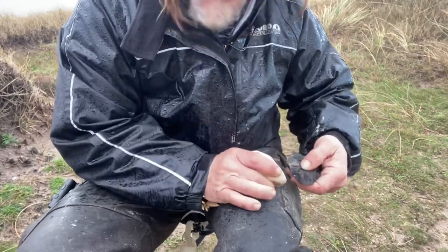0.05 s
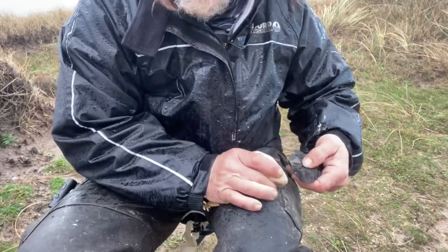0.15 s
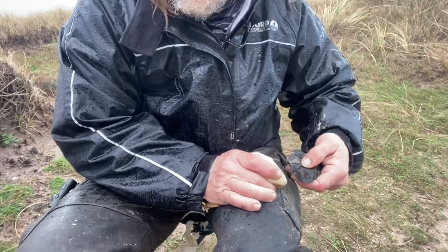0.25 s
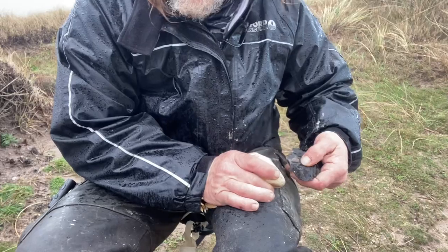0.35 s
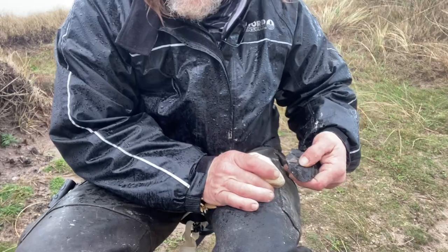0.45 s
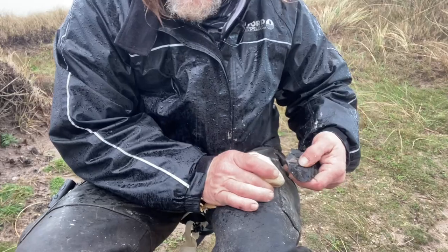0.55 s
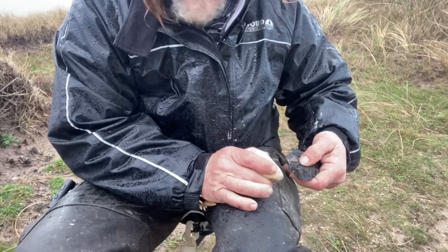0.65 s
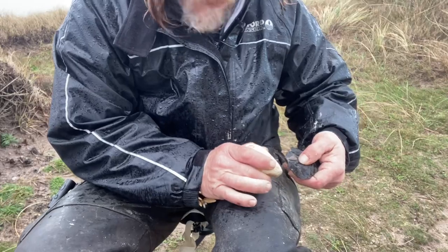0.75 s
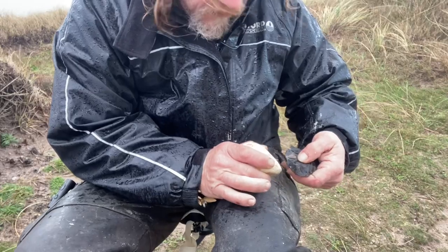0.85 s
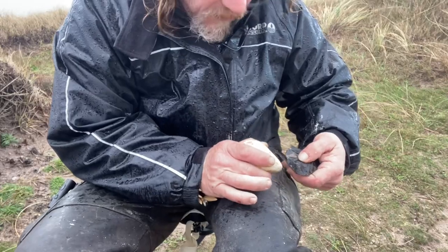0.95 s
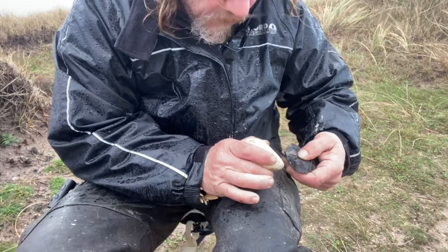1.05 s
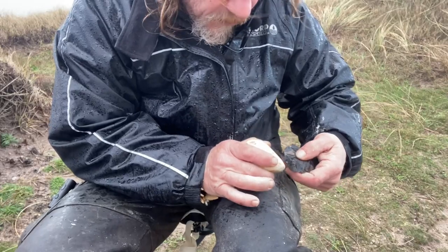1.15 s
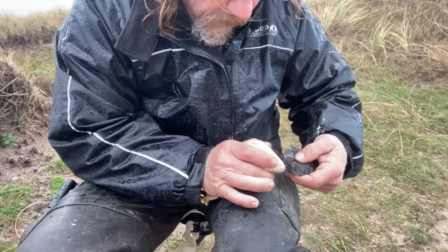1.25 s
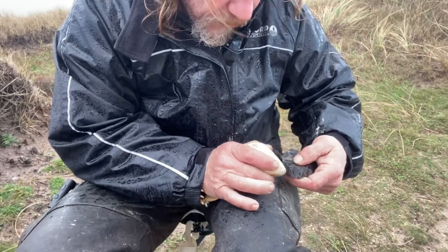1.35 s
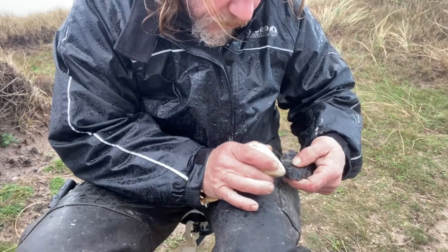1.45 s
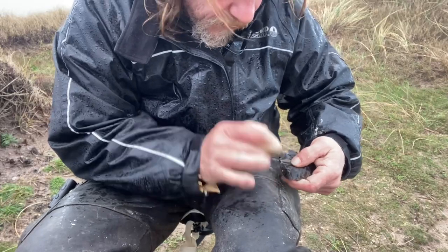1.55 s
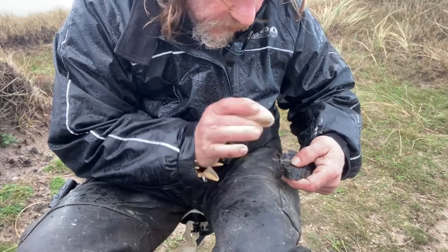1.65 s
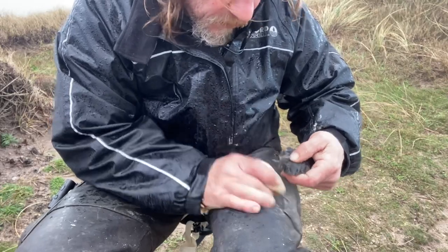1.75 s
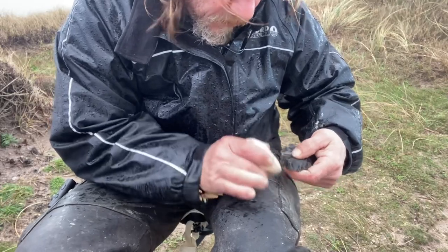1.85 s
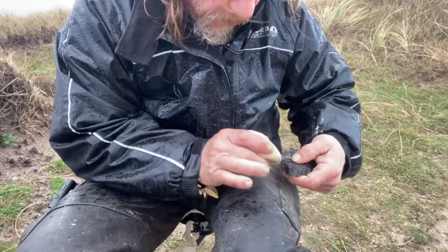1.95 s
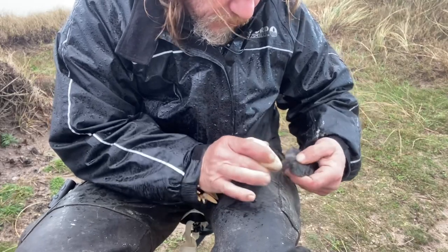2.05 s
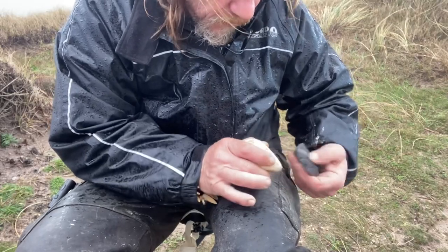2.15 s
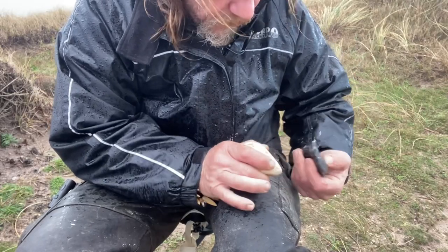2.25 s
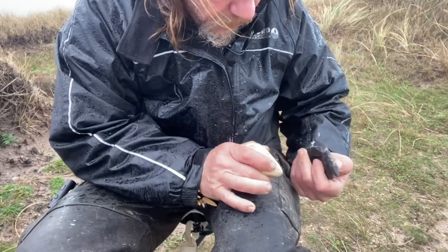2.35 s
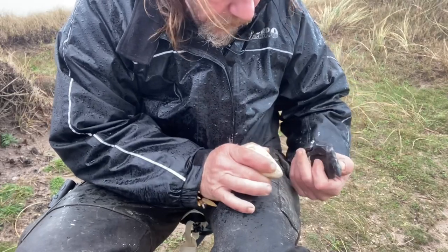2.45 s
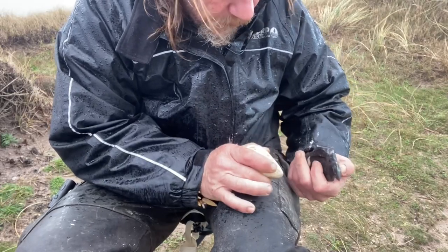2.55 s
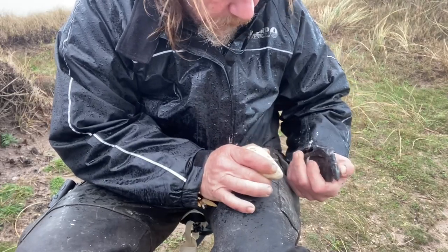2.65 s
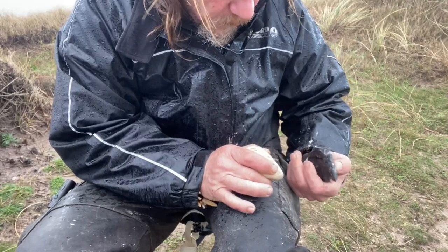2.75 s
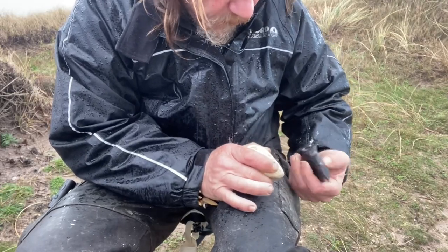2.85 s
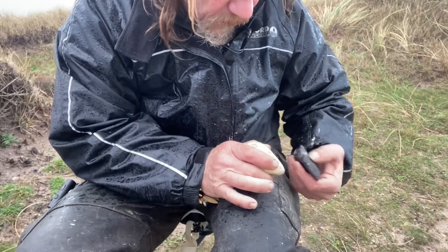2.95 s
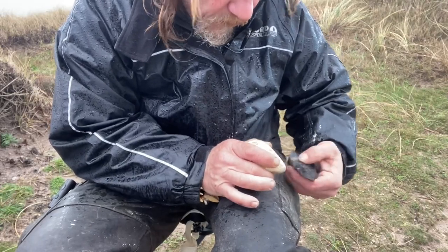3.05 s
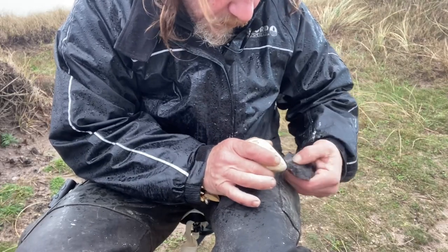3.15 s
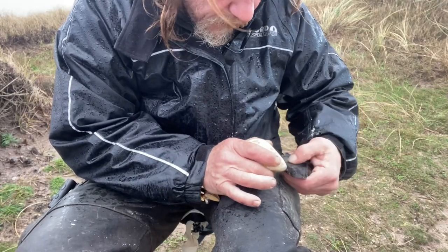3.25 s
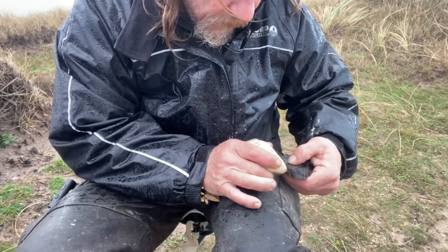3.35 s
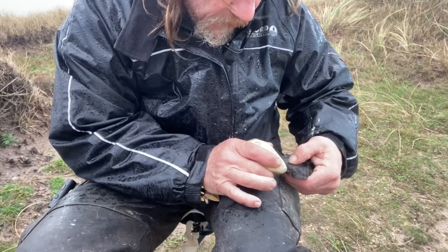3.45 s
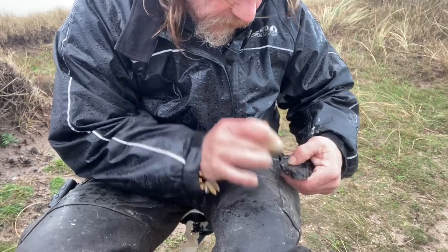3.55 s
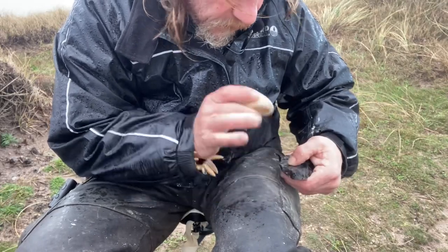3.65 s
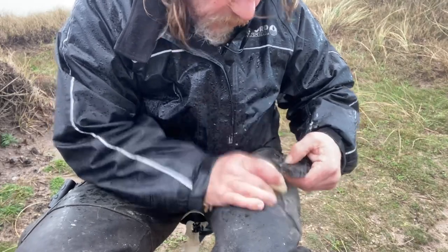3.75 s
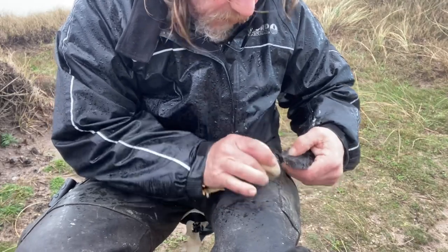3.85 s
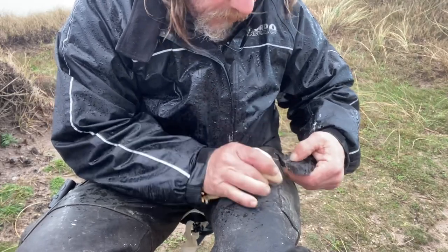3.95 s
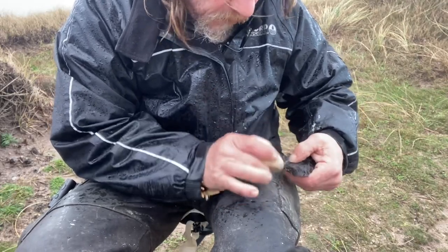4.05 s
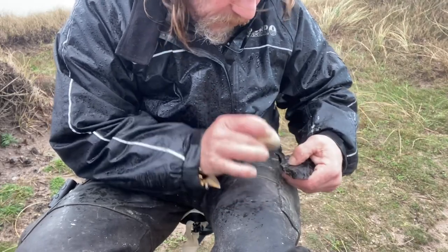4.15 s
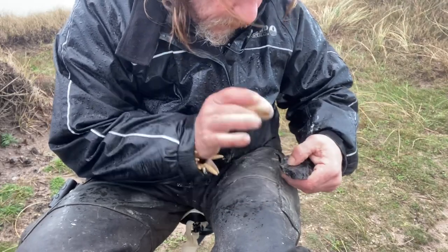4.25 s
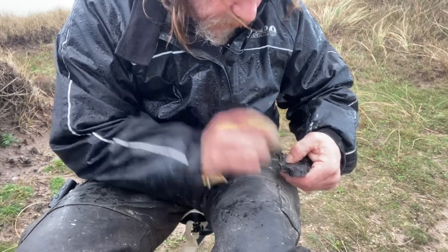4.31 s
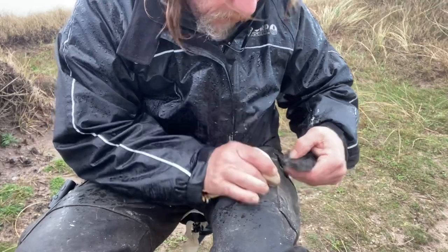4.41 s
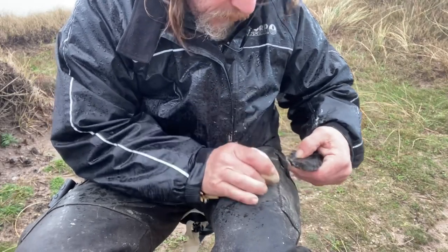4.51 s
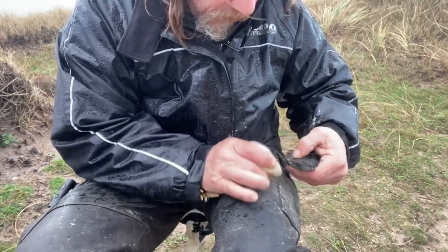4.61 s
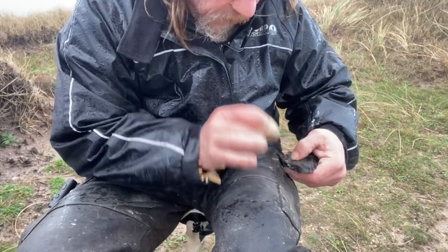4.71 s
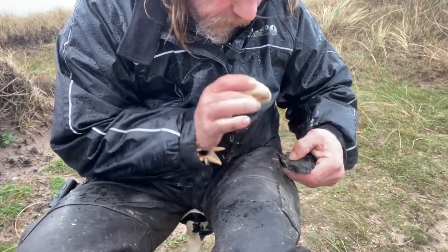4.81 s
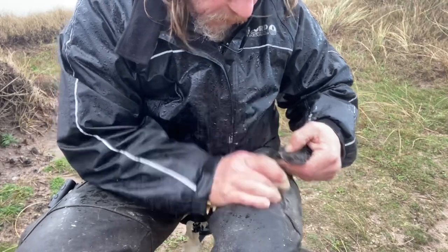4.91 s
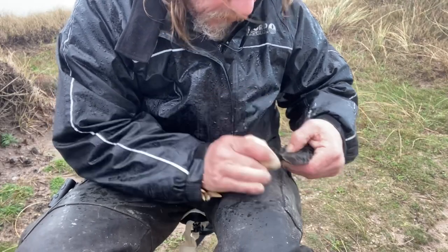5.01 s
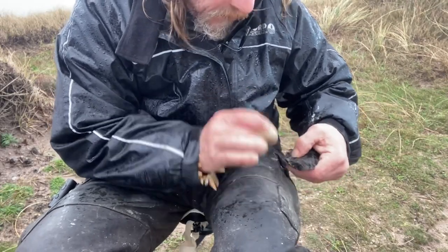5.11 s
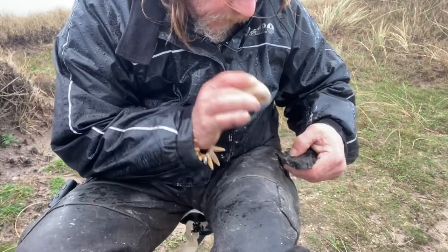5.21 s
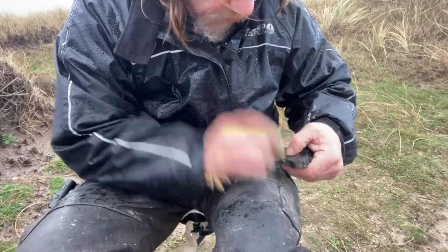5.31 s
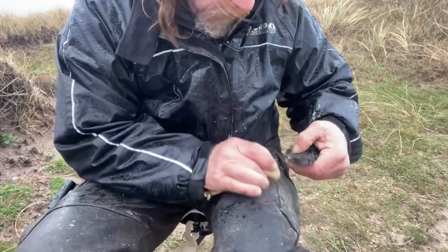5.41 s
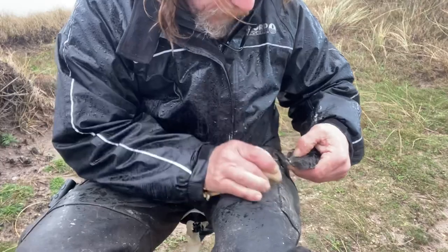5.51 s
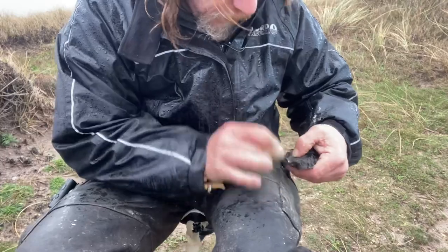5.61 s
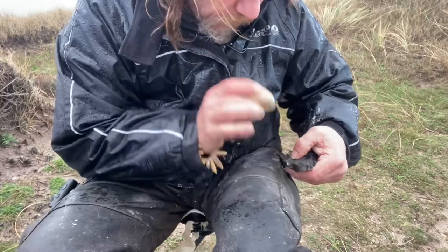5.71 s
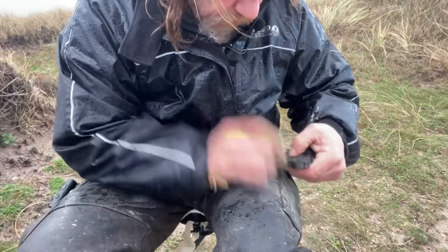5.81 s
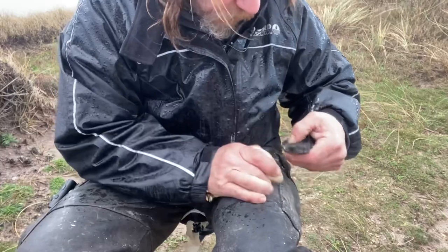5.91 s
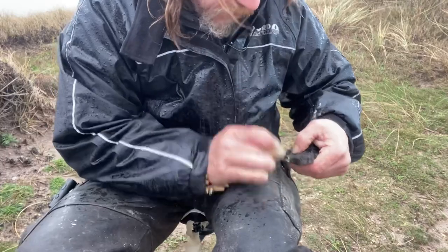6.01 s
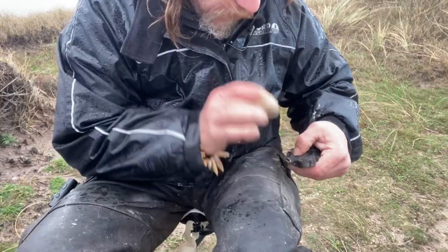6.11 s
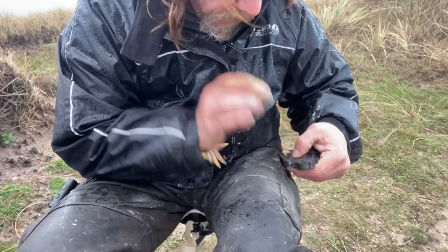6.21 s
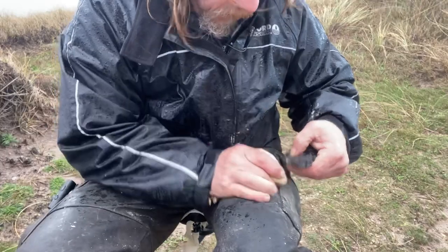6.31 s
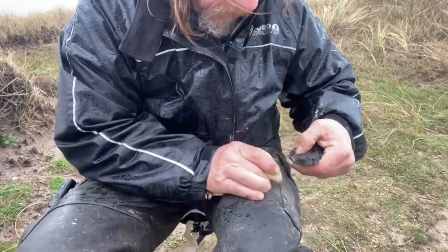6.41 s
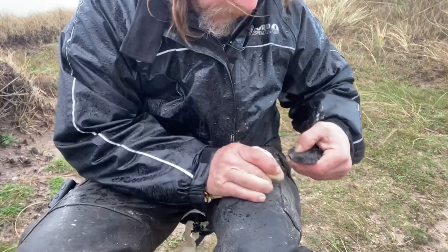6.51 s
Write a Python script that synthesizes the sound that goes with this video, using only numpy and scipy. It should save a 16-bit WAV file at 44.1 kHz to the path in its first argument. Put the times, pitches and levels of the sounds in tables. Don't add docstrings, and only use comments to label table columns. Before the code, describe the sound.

Sharp stone-on-stone cracks, first faint, later hard and evenly spaced, with rustling rain-wet cloth and buffeting wind outdoors.

```python
import sys
import numpy as np
from scipy import signal
from scipy.fft import rfft, irfft
from scipy.io import wavfile
from scipy.ndimage import uniform_filter1d

SR = 44100
rng = np.random.default_rng(int(sys.argv[2]) if len(sys.argv) > 2 else 0)


def volts_from_decibels(level):
    exponent = np.asarray(level, float) / 20
    return 10 ** exponent


def wav_out(sig):
    wavfile.write(sys.argv[1], SR, np.round(np.clip(np.atleast_2d(sig).T, -1, 1) * 32767).astype(np.int16))


N = 289737
HZ = np.arange(N // 2 + 1) * SR / N

# start_s, rumble_db, flutter_over_rumble_db, left_minus_right_db
STEADY_WIND = [(0.0, -29.5, -12, 0), (0.24, -39, -25, -1), (0.44, -44, -4, -0.5), (0.66, -38, -11, -0.5),
               (1.17, -47, -3.5, 0), (1.36, -35.5, -18, -5.5), (1.5, -40, -22, -1), (2.16, -43.5, -1, -3.5),
               (2.47, -44, -1, -3), (3.11, -35, -9.5, -2.5), (3.33, -42.5, -5.5, -2.5),
               (3.55, -27, -6.5, 0), (3.77, -29.5, -7, -0.5), (3.84, -41, -1.5, 0), (4.5, -42, -5, -2),
               (5.07, -42.5, -1.5, -1.5), (5.69, -38.5, -2.5, -0.5), (6.57, -31, -8, -4)]
# peak_s, rumble_db, length_s, flutter_over_rumble_db
PUFFS = [(0.049, -25, 0.067, -9), (0.131, -26.5, 0.07, -13), (0.252, -32, 0.17, -20),
         (1.236, -30.5, 0.12, -13), (1.297, -28, 0.064, -13), (1.397, -21, 0.031, -10),
         (2.283, -35.5, 0.32, -5.5), (3.28, -41, 0.055, 9), (3.324, -29, 0.089, -17),
         (3.883, -34, 0.071, -3), (3.96, -27.5, 0.064, -2.5), (4.002, -31.5, 0.12, -4.5),
         (4.134, -31.5, 0.16, -7.5), (4.314, -31, 0.19, -12), (4.532, -25, 0.15, -4),
         (4.692, -26, 0.12, -6.5), (4.755, -29, 0.1, -6), (4.844, -26.5, 0.071, -13),
         (4.905, -34, 0.081, -5), (5.1, -35, 0.071, 5), (5.183, -27.5, 0.22, -9), (5.33, -24, 0.055, -11),
         (5.545, -36.5, 0.28, -0.5), (5.871, -26, 0.16, -3.5), (5.987, -26, 0.068, -2.5),
         (6.072, -28, 0.16, -8), (6.308, -26, 0.14, -7.5), (6.391, -21, 0.096, -10.5),
         (6.516, -22.5, 0.14, -5.5)]
# freq_hz, level_db (per Hz)
RUMBLE_COLOUR = [(20, -29), (35, 0.5), (60, 6), (100, -2), (180, -8.5), (300, -17.5), (500, -65)]
# freq_hz, level_db (per Hz)
FLUTTER_COLOUR = [(80, -53.5), (150, -0.5), (230, -5), (330, -4.5), (500, -13.5), (800, -19.5), (1100, -31),
                  (2000, -69.5)]
# peak_s, level_db, ripple_db, left_minus_right_db
SLAPS = [(0.108, -15, -52, -8.5), (1.234, -16.5, -55, 2), (1.398, -4.5, -39.5, -12.5),
         (3.268, -22, -36, 2.5), (3.284, -20, -34, 14), (3.381, -23, -33, 19), (3.456, -13.5, -46, 0.5),
         (3.531, -31, -40, 4), (3.571, -35, -28.5, 7), (3.64, -10, -40, 2), (3.877, -17.5, -39, -2.5),
         (3.968, -28, -36, 6), (4.505, -31, -44, 10), (4.527, -16, -39, -10), (4.551, -27, -40, 19),
         (4.666, -22, -36, 10), (4.686, -23, -33, 6), (4.711, -35, -29.5, 12), (5.101, -23.5, -25, 15),
         (5.143, -36, -29.5, 13), (5.317, -10.5, -50, -8), (5.973, -20, -29, 11), (5.993, -12.5, -30, 5),
         (6.041, -9, -28.5, 2), (6.094, -28, -34, 3), (6.378, -10.5, -40, -1), (6.459, -12, -33.5, 6),
         (6.487, -7, -43, -3), (6.503, -9.5, -31, 3.5), (6.56, 1, -42, -4),
         (.015, -19, -48, 6.5), (.044, -26, -46, 0), (.075, -32, -45, 2), (.295, -22, -51, 5),
        (.471, -43, -49, 0), (.496, -50, -52, 0), (.522, -27, -44.5, 0), (.685, -34, -49, 1),
        (.831, -34, -51, -2), (.887, -32, -51, 3), (.97, -26, -45.5, 0), (1.3, -23, -49, -3),
        (2.217, -42, -48, 0), (2.264, -26, -46, 2), (2.316, -34, -47, 2), (2.379, -34, -47, 1),
        (2.515, -36.5, -50, 2), (2.991, -39, -51, 0), (3.018, -36, -51, 3), (3.544, -28, -38, 5),
        (3.62, -32, -45, 3), (3.943, -34, -40, 5), (4.075, -32, -38, 3), (4.476, -32, -41, 0),
        (5.115, -32, -37, 8), (5.221, -35, -43, 3), (5.546, -32, -40, 3), (5.635, -34, -42, 3),
        (5.666, -42, -40, 3), (5.882, -28, -38, 5), (5.918, -28, -37, 5), (5.983, -28, -32.5, 4),
        (6.05, -28, -33.5, 6), (6.236, -30, -37, 5), (6.408, -26, -43.5, 0), (6.517, -28, -31, -3)]
# freq_hz, level_db (per Hz)
GRASS_COLOUR = [(200, -6), (400, 0), (700, 0), (1100, -5), (1800, -8), (2600, -12), (4000, -18),
                (5500, -25), (7500, -32), (10000, -43), (13000, -52), (16000, -70)]
# start_s, length_s, level_db, from_hz, to_hz
SQUEAKS = [(3.6, .12, -58, 1600, 1900), (4.07, .2, -50.5, 2050, 2350), (3.55, 0.163, -63, 2100, 2200),
           (5.0, .25, -61, 2400, 2300), (0, 0.23, -55.5, 1184, 1240), (3.378, 0.013, -49, 1240, 1010),
           (3.526, .012, -47, 800, 700), (3.564, 0.025, -41, 1000, 900), (4.074, .012, -42.5, 700, 650),
           (5.094, 0.024, -39, 1050, 910), (5.14, 0.013, -44, 840, 750), (5.966, .032, -39.5, 990, 946),
           (6.035, 0.021, -38.5, 1085, 950), (6.09, 0.017, -44, 1200, 1100), (6.203, 0.047, -46, 947, 854),
           (6.488, 0.028, -42, 995, 850), (3.72, .025, -49, 2200, 2200), (4.501, .01, -44, 750, 650),
           (4.523, .01, -42, 745, 650), (4.664, .01, -42, 750, 650), (4.684, 0.011, -40, 800, 700),
           (5.62, .08, -54, 1100, 1100), (3.844, .01, -47, 1100, 900), (3.977, .01, -44, 850, 750)]
# start_s, length_s, level_db
FIDGETS = [(0.0, 0.23, -73), (0.23, 0.22, -82), (0.577, 0.79, -74.5), (1.786, .16, -66),
           (1.857, 0.038, -62), (1.984, 0.62, -76), (2.756, 0.45, -80.5), (3.898, 0.076, -64),
           (4.433, 0.056, -65.5), (4.493, 0.073, -64), (5.448, 0.5, -69), (5.94, 0.19, -67),
           (6.404, 0.15, -73.5)]
# blow_s, lift_start_s, lift_length_s, lift_db, settle_length_s
STROKES = [
    (1.73, 1.463, 0.21, -57.5, 0.063),
    (3.742, 3.475, .2, -56.5, 0.14),
    (4.345, 4.0, 0.29, -59, 0.089),
    (4.901, 4.57, 0.31, -57.5, 0.12),
    (5.337, 4.96, 0.34, -57.5, .15),
    (5.842, 5.55, 0.21, -56, 0.096),
    (6.269, 5.99, 0.21, -55, 0.14),
]
# time_s, level_db
LEAN = [(0.0, -66), (.18, -57), (.3, -79), (1.4, -74), (2.0, -68), (2.4, -52.5), (3.1, -59), (3.5, -55.5),
        (3.8, -51), (3.98, -46.5), (4.17, -48), (4.4, -54), (4.75, -47.5), (5.4, -48.5), (5.7, -46),
        (6.1, -45), (6.57, -46.5)]
# freq_hz, level_db (per Hz)
CLOTH_COLOUR = [(1500, -5.5), (3000, -0.5), (5000, -1), (8000, -4), (13000, -9.5), (15500, -7),
                (17000, -41.5)]
# freq_hz, level_db (per Hz)
DRAG_COLOUR = [(600, 9), (1300, 2.5), (1700, 6), (2200, 7.5), (2800, 1.5), (3500, -1.5), (5000, -78)]
# peak_s, level_db, width_ms
TICKS = [(.385, -35, .02), (1.32, -37, .02), (1.3985, -32, .02), (2.07, -37, .02), (3.13, -43, .02),
         (4.565, -33, .02), (5.846, -2.5, .12), (5.3405, -5, .1), (6.2759, -7, .12), (3.7458, -12, .1)]
# start_s, peak_db, main_ring_hz, upper_rings_db, crack_db
CONTACTS = [(1.7302, -35, 1580, 15, 15), (1.7382, -23.5, 1300, -17, -18), (1.745, -34.5, 1020, -18, -20),
            (1.752, -34.5, 766, -17, -17), (1.874, -41, 703, -12, -13), (3.745, -12, 1486, 1, 3.5),
            (3.7482, -12, 1480, -18, -23), (4.3485, -11.5, 1486, 3, 4.5), (4.351, -11, 1490, 5, -25),
            (4.358, -26, 920, -16, -11.5), (4.88, -39, 1750, 13, -4), (4.905, -12, 1170, -17, -1),
            (4.908, -16.5, 1260, -9, -11), (5.339, -6.5, 1489, -6, -11.5), (5.3406, -6, 1490, -11, -22),
            (5.351, -24.5, 785, -18, 7), (5.8376, -24.5, 980, 8, 7.5), (5.8447, -21, 1100, 2, 3),
            (5.85, -20, 923, -10, -9), (6.2755, -3.5, 1510, -4, -20), (6.2827, -16.5, 1013, -21, -5)]
# multiple_of_main_ring, level_db, t60_s
BODY_RINGS = [(0.998, 5.5, 0.019), (1.3, -6, 0.025), (1.52, -5, 0.021), (1.5, -7.5, 0.011),
              (1.22, -6, .008), (0.99, -17, 0.02), (0.34, -8.5, 0.0065), (0.334, -33, 0.016),
              (0.936, -4, .012)]
# freq_hz, level_db, t60_s
EDGE_RINGS = [(3510, 5, 0.021), (4330, -1.5, 0.019), (5070, -3.5, 0.023), (6100, -14.5, 0.005),
              (6720, -8, 0.015), (3620, -4.5, 0.009), (2730, -18, 0.042)]
# freq_hz, level_db, t60_s
CRACK_RINGS = [(7400, 10, 0.007), (8300, 10, .006), (8930, 14.3, 0.0095), (9750, 9.1, .006),
               (10500, 6.2, .006), (12700, 6, 0.005), (13900, 3, .005)]
# start_s, level_db, pitch_hz, push_ms, t60_s
FLAKES = [(1.7312, -7, 10450, 2.6, .007), (4.3485, -19, 10600, 2.0, .012),
          (5.3395, -27, 13900, 1.2, .006), (3.7455, -26, 10500, 1.5, .01)]
FLAKES = FLAKES + [(1.7313, -21, 9300, 1.5, .008), (1.7322, -33, 12200, 3.0, .01),
          (1.733, -30, 13000, 2.5, .008), (1.7318, -28.5, 4100, 2.2, .01), (5.3397, -18, 1100, 1.2, 0.011),
          (3.7456, -17, 2200, 1.2, .012), (4.3488, -21, 1700, 1.0, .01), (4.9058, -21, 10000, 1.2, .006)]
# blow_s, level_db, thud_db, fade_s
GRINDS = [
    (1.742, -59.5, -46, .008),
    (3.748, -28.5, -28.5, 0.0043),
    (4.342, -30, -40, 0.0044),
    (4.903, -26, -26, 0.0016),
    (5.35, -27, -30.5, .0026),
    (5.843, -24, -26, 0.0038),
    (6.273, -23.5, -22.5, 0.0047),
]
# freq_hz, level_db (per Hz)
GRIND_COLOUR = [(300, -49), (800, -15.5), (2000, -3.5), (4000, -6), (8000, -11), (13000, -17), (17000, -49)]
# freq_hz, level_db (per Hz)
THUD_COLOUR = [(150, -15), (350, -9.5), (600, -1), (1000, -7), (1500, -2.5), (2500, -45)]
# freq_hz, lag_s
STONE_LAG = [(1500, .00014), (3500, .00009), (5500, .00004)]


def unit(x):
    return x / np.sqrt(np.mean(x ** 2))


def colour(x, points):
    hz, db = np.transpose(points)
    gain = volts_from_decibels(np.interp(np.log(HZ + 1), np.log(hz), db))
    return unit(irfft(rfft(x) * gain, N))


def late(x, s):
    return irfft(rfft(x) * np.exp(-2j * np.pi * HZ * s), N)


def walk(rate):
    hold = int(SR / rate)
    steps = np.repeat(rng.standard_normal(N // hold + 1), hold)
    return 1.3 * uniform_filter1d(uniform_filter1d(steps, hold), hold)[:N]


def curves(table):
    s, *columns = np.transpose(table)
    return [np.interp(np.arange(N) / SR, s, c) for c in columns]


def add(out, s, y):
    i = int(s * SR)
    out[..., i:i + y.shape[-1]] += y[..., :N - i]


def grit(spread_db, rate):
    return rng.standard_normal(N) * volts_from_decibels(spread_db * walk(rate))


def eddies(rate, spread_db):
    pushes = (rng.random(N) < rate / SR) * rng.standard_normal(N)
    return pushes * volts_from_decibels(spread_db * rng.exponential(size=N))


def gusts():
    t = np.arange(N) / SR
    rumble_db, over_db, pan_db = curves(STEADY_WIND)
    flutter_db = rumble_db + over_db
    edge_db, rise_share = -10, 0.49
    for s, db, length, over in PUFFS:
        away = np.maximum((s - t) / rise_share, (t - s) / (1 - rise_share)) / length
        rumble_db = np.maximum(rumble_db, db + edge_db * away)
        flutter_db = np.maximum(flutter_db, db + over + edge_db * away)
    return rumble_db, flutter_db, pan_db


def wind():
    rumble_db, flutter_db, pan_db = gusts()
    opposed = np.array([[1], [-1]])
    rumble = np.array([colour(grit(1.5, 30), RUMBLE_COLOUR) for _ in range(3)])
    flutter = np.array([colour(eddies(700, 2.0) * volts_from_decibels(2 * walk(40)), FLUTTER_COLOUR) for _ in range(3)])
    out = volts_from_decibels(rumble_db + 3.0) * (0.63 * rumble[:2] + 0.51 * rumble[2])
    out += volts_from_decibels(flutter_db) * (1.14 * flutter[:2] + 1.2 * flutter[2] * opposed)
    out *= volts_from_decibels(np.array([pan_db, -pan_db]) / 2)
    t = np.arange(-300, 900) / SR
    slaps = SLAPS
    for (s, db, ripple_db, pan), chance in zip(slaps, rng.random((len(slaps), 3))):
        dull = volts_from_decibels(db - 4.0) * np.exp(-(t / 0.0021) ** 2)
        ripple_hz = 405 * (.9 + .3 * chance[0])
        ripple_s = np.cumsum(chance * [0, .005, .005])[:, None]
        u = (t - ripple_s) * np.pi * ripple_hz
        ripples = np.array([1, -.4, .25]) @ ((1 - 2 * u ** 2) * np.exp(-u ** 2))
        slap = dull + volts_from_decibels(ripple_db + 17.0) * ripples * np.array([[.05], [1]])
        add(out, s + t[0], slap * volts_from_decibels(pan * opposed / 2))
    return out


def grass():
    lag_s, level_db, pan_db, alike = .00047, -48, -3.5, 0.8
    shared, left, right = (colour(grit(1.0, 14), GRASS_COLOUR) for _ in range(3))
    pair = np.sqrt(alike) * np.array([late(shared, lag_s), shared])
    pair += np.sqrt(1 - alike) * np.array([left, right])
    return pair * volts_from_decibels(level_db + .6 * walk(.6) + np.array([[1], [-1]]) * pan_db / 2)


def squeak():
    out = np.zeros((2, N))
    width = int(SR / 550)
    chances = rng.standard_normal((len(SQUEAKS), 4, SR // 3))
    for (s, length, db, from_hz, to_hz), chance in zip(SQUEAKS, chances):
        u = np.arange(int(length * SR)) / (length * SR)
        smooth = uniform_filter1d(uniform_filter1d(chance, width), width)
        a = smooth[:, :len(u)] * np.sqrt(width)
        phase = 2 * np.pi * np.cumsum(from_hz + (to_hz - from_hz) * u) / SR
        middle, side = a[:2] * np.cos(phase) + a[2:] * np.sin(phase)
        swell = np.sqrt(np.abs(np.sin(np.pi * u)))
        add(out, s, volts_from_decibels(db) * swell * (middle + 0.31 * side * np.array([[1], [-1]])))
    return out


def move(start, length, db, late_by=0.8):
    u = np.clip((np.arange(N) / SR - start) / length, 0, 1)
    return volts_from_decibels(db) * np.abs(np.sin(np.pi * u ** late_by)) ** 0.85


def sleeve():
    t = np.arange(N) / SR
    swing_lead_s, swing_rise_s, swing_fall_s = 0.067, 0.036, 0.0048
    rest_db, swing_db, settle_db = -80.5, -50, -55.5
    swish = volts_from_decibels(rest_db) + sum(move(*row) for row in FIDGETS)
    for s, start, length, db, settle in STROKES:
        lift = move(start, length, db, 1.24)
        speed = np.clip((t - s + swing_lead_s) / swing_rise_s, 0, 1) ** 2
        swing = speed * np.exp(-np.maximum(t - s, 0) / swing_fall_s)
        settling = move(s - settle / 2, 1.556 * settle, settle_db) * (t > s)
        swish = swish + lift + volts_from_decibels(swing_db) * swing + settling
    drag = volts_from_decibels(curves(LEAN)[0]) + volts_from_decibels(-2) * swish

    def rub():
        cloth = swish * volts_from_decibels(10.0 + 0.8 * walk(60)) * colour(grit(1.9, 900), CLOTH_COLOUR)
        return cloth + drag * volts_from_decibels(-0.23) * colour(grit(1.4, 150), DRAG_COLOUR)

    creases = volts_from_decibels(.8 * walk(30))
    return creases * (0.76 * rub() + 0.6 * rub() * np.array([[1], [-1]]))


def ticks():
    out, t = np.zeros(N), np.arange(-60, 60) / SR
    for s, db, width_ms in TICKS:
        u = t * 1000 / width_ms
        add(out, s + t[0], volts_from_decibels(db) * (1 - u ** 2) * np.exp(-u ** 2))
    return out


def ring(modes, rise_ms, chance):
    t = np.arange(2048) / SR
    y = 0
    for (hz, db, t60), c in zip(modes, chance):
        decay = np.exp(-np.log(1000) * t / t60)
        y = y + volts_from_decibels(db + 2.0 * c) * np.sin(2 * np.pi * (hz * t + c)) * decay
    y = y * (1 - np.exp(-t * 1000 / rise_ms))
    return y / np.abs(y).max()


def stones():
    out, t = np.zeros(N), np.arange(2048) / SR
    chances = rng.standard_normal((len(CONTACTS), 2048))
    for (s, db, hz, edge_db, crack_db), chance in zip(CONTACTS, chances):
        rise_ms = 1000 * 0.55 / hz
        soft_db = 54.5 * (1490 / hz - 1)
        modes = [(k * hz, d - soft_db * max(k - 1, 0), t60) for k, d, t60 in BODY_RINGS]
        body = ring(modes, rise_ms, chance)
        body += .5 * uniform_filter1d(chance, size=7) * np.exp(-t / 0.0025)
        edge = ring(EDGE_RINGS, .5 * rise_ms, chance[12:])
        splinters = chance * np.exp(-t / .0018)
        splinters[4:6] += 2.5, -2.5
        crack = ring(CRACK_RINGS, 0.059, chance[24:]) + 0.66 * splinters
        add(out, s + 0.0005, volts_from_decibels(db) * (body + volts_from_decibels(edge_db) * edge + volts_from_decibels(crack_db) * crack))
    for s, db, hz, push_ms, t60 in FLAKES:
        decay = np.exp(-np.log(1000) * np.maximum(t - push_ms / 1000, 0) / t60)
        add(out, s, volts_from_decibels(db) * np.sin(2 * np.pi * hz * t) * np.minimum(t / 0.00042, 1) * decay)
        if db > -20 and hz > 10000:
            add(out, s, volts_from_decibels(db + 9.0) * np.sin(2 * np.pi * 13000 * t) * np.exp(-t / 0.00021))
    return out


def grind():
    t, level, thud = np.arange(N) / SR, 0, 0
    swell_s, hold_s = 0.028, 0.013
    for s, db, thud_db, fade_s in GRINDS:
        swell = np.minimum(t - s, 0) / swell_s
        fade = np.maximum(t - s - hold_s, 0) / fade_s
        level = level + volts_from_decibels(db) * np.exp(swell - fade) * np.where(t < s, .45, 1)
        after = np.maximum(t - s, 0) / 0.005
        thud = thud + volts_from_decibels(thud_db) * np.e * after * np.exp(-after)
    return level * colour(grit(1.8, 500), GRIND_COLOUR) + thud * colour(grit(1.8, 500), THUD_COLOUR)


def scene():
    near = stones() + grind() + ticks()
    echo = late(near, 0.001065) * volts_from_decibels(-20.5)
    left = volts_from_decibels(-2.0) * late(near, np.interp(HZ, *np.transpose(STONE_LAG)))
    knapping = np.array([left + echo, near - late(echo, 0.000382)])
    return wind() + grass() + squeak() + sleeve() + knapping


def band_limit(x):
    return signal.sosfilt(signal.butter(12, 15830, fs=SR, output="sos"), x)


def record(dry):
    wide = np.pad(dry, ((0, 0), (4096, 4096)), mode="reflect")
    size = wide.shape[1]
    hz = np.fft.rfftfreq(size, 1 / SR)
    treble = np.clip((hz - 5900) / 1100, 0, 1)
    left, right = rfft(wide)
    spread = -left * np.exp(-2j * np.pi * hz * .000193)
    sharp = uniform_filter1d(np.abs(irfft(treble * right, size)), size=220)
    loud = np.clip(sharp / volts_from_decibels(-22.5), 0, 1)
    right = (1 - treble) * right + treble * (spread + 0.31 * rfft(loud * wide[1]))
    low = np.clip(hz, 30, 900) / 900
    lag = np.exp(-2j * np.pi * 1.372 * (np.log(low) - low + 1))
    cut = hz ** 4 / (hz ** 4 + 45.4 ** 4) / (1 + (hz / 15700) ** 24)
    heard = irfft(np.array([left, right]) * lag * cut, size)[:, 4096:-4096]
    mix = np.tanh(0.8 * heard) / 0.8
    return band_limit(mix)


dry = scene()
out = record(dry)
wav_out(out)
```